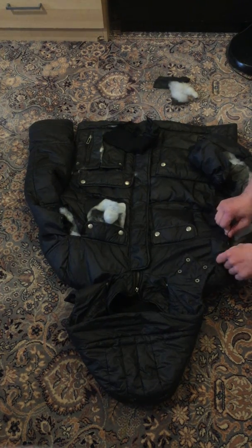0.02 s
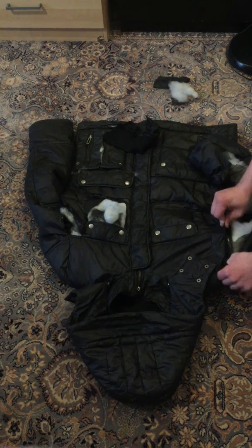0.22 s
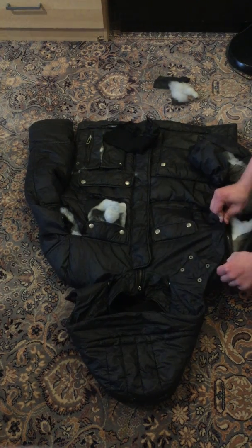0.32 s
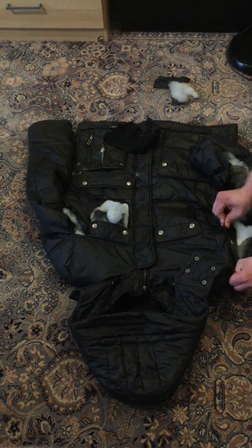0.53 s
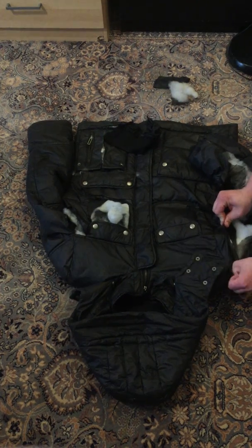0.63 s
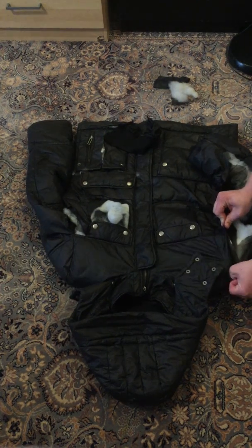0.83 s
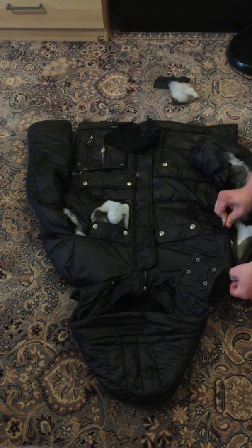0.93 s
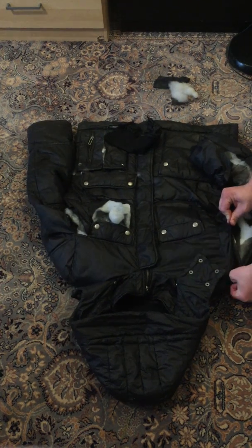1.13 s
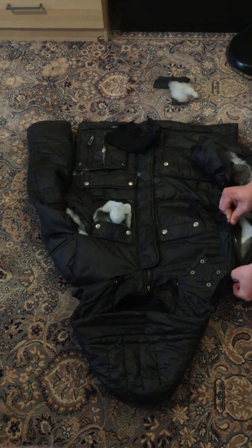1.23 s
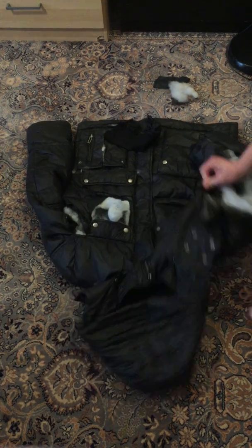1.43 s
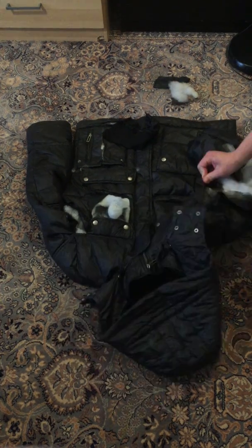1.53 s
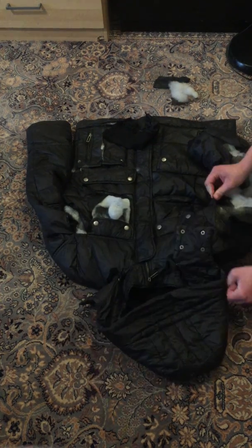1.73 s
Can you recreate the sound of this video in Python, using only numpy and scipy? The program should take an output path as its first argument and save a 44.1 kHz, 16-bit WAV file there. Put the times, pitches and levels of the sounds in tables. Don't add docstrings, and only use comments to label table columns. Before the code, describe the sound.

Tearing of a quilted nylon jacket by hand: crisp rips, single stitch pops, a final yank

```python
import sys
import numpy as np
from scipy import signal
from scipy.fft import rfft, irfft
from scipy.io import wavfile

SR = 44100
rng = np.random.default_rng(int(sys.argv[2]) if len(sys.argv) > 2 else 0)


def decibels_to_gain(level_db):
    exponent = np.asarray(level_db, float) / 20
    return 10 ** exponent


def to_wav(sig):
    pcm = np.clip(np.atleast_2d(sig), -1, 1) * 32767
    pcm = np.round(pcm).astype(np.int16)
    wavfile.write(sys.argv[1], SR, pcm.T)


N = 77175


def read(points, hz):
    f, value = np.transpose(points)
    return np.interp(np.log(hz + 1), np.log(f + 1), value)


def evened(x):
    return x / np.sqrt(np.mean(x ** 2) + 1e-20)


def coloured(x, points):
    gain = decibels_to_gain(read(points, np.fft.rfftfreq(len(x), 1 / SR)))
    return irfft(rfft(x) * gain, len(x))


def add(mix, s, sound):
    part = mix[max(round(s * SR), 0):][:len(sound)]
    part += sound[:len(part)]


# (frequency [Hz], level [dB per Hz])
HUSH_COLOUR = [(45, 3), (70, -0.5), (150, -6), (600, -10), (2500, -15), (6000, -19), (17000, -26)]


def room_hush():
    hush_db = -66.5
    return decibels_to_gain(hush_db) * evened(coloured(rng.standard_normal(N), HUSH_COLOUR))


# (frequency [Hz], t60 [s])
ROOM_DECAY = [(150, 0.26), (2500, 0.28), (6000, 0.21), (14000, 0.17)]
# (frequency [Hz], level [dB])
ROOM_COLOUR = [(150, -6), (700, 2.5), (2500, 1.5), (5000, 0.5), (9000, -5.5), (16000, -1.5)]


def room(x):
    tail_db, wall_db = -6.5, -9
    wall_s, wall_smear_s = 0.0049, 0.0021
    t = np.arange(SR // 2) / SR

    taps = np.zeros(len(t))
    at = np.arange(0, len(t) - 20, 20)
    taps[at + rng.integers(0, 20, len(at))] = rng.choice([-1., 1.], len(at))
    hz, frame_s, z = signal.stft(taps, SR, nperseg=256)
    decay = decibels_to_gain(-60 * frame_s / read(ROOM_DECAY, hz)[:, None])
    tail = signal.istft(z * decay, SR, nperseg=256)[1][:len(t)]
    tail = tail * np.clip((t - wall_s) / 0.0012, 0, 1)

    smear = np.exp(-((t - wall_s - wall_smear_s / 2) / wall_smear_s) ** 2 * 2)
    wall = rng.standard_normal(len(t)) * smear
    both = decibels_to_gain(tail_db) * tail / np.linalg.norm(tail) + decibels_to_gain(wall_db) * wall / np.linalg.norm(wall)
    return signal.fftconvolve(x, coloured(both, ROOM_COLOUR))[:N]


# (time [s], pitch [Hz], level [dB], t60 [s])
STUD_TINKS = [
    (1.656, 10099, -69, .12),
    (1.718, 9835, -66, .12),
    (1.718, 15665, -67, .1),
]
# (time [s], pitch [Hz], level [dB], t60 [s])
FOLD_RINGS = [(.2244, 6080, -20.5, 0.0014), (.2833, 690, -44, .006), (.4272, 14500, -20, 0.0022),
              (.5750, 13500, -16, .002), (.6403, 12500, -40, 0.0022), (.8187, 2760, -31, 0.0066),
              (.8187, 3270, -34.5, 0.0043), (.9897, 3320, -32.5, .005), (.2244, 1560, -36.5, .004),
              (.9899, 940, -40, 0.0058), (.9058, 5500, -38, 0.0035), (.9897, 5840, -27, 0.0066),
              (.9897, 9150, -28, 0.0074), (.9897, 1510, -31.5, 0.0079), (1.1762, 7300, -24, 0.0025),
              (1.1782, 1900, -33, .004), (1.1826, 6160, -45, 0.0022), (1.1897, 7000, -32, 0.006),
              (1.4099, 5800, -21, 0.009), (1.4118, 1880, -26, 0.0047), (1.4214, 16200, -10, .002),
              (1.4254, 6600, -11.5, .003), (1.4344, 1510, -34, 0.0035), (1.4486, 12100, -38, .003)]


def folds_and_studs():
    t, out = np.arange(6000) / SR, np.zeros(N)
    for s, hz, db, t60 in FOLD_RINGS + STUD_TINKS:
        decay = decibels_to_gain(db - 60 * t / t60)
        add(out, s, decay * np.sin(2 * np.pi * hz * t))
    return out


# (time [s], level [dB], pitch [Hz], rise to the crest [cycles])
PANEL_TUGS = [(.283, -33, 417, 0.7), (.297, -30.5, 596, 0.99), (0.3151, -21, 430, 0.15),
              (.327, -58, 605, 0.56), (.534, -36.5, 750, 0.59), (0.549, -42, 340, 1.15),
              (0.712, -55, 363, 1.5), (1.59, -49, 240, .6), (1.655, -57, 365, 1.4), (.905, -54, 600, 1.3),
              (.576, -40, 304, 0.6), (0.603, -42, 363, 0.96), (0.639, -41, 358, 1.3),
              (.669, -37.5, 357, 1.2), (.737, -47, 352, 0.43), (.819, -44.5, 386, 0.58),
              (0.9911, -28.5, 550, 0.24), (1.1772, -33, 650, 0.28), (1.183, -28.5, 464, 0.23),
              (1.411, -34.5, 560, 0.77), (1.42, -31, 302, 0.74), (1.433, -27.5, 648, 0.97),
              (1.465, -29, 254, 0.75), (1.5133, -36, 380, 0.3), (1.742, -56, 324, 0.97)]


def panel_tugs():
    push_db = -24.5
    t, out = np.arange(3000) / SR, np.zeros(N)
    for s, db, hz, cycles in PANEL_TUGS:
        u = t * hz / max(cycles, .2)
        rock = np.sin(2 * np.pi * hz * t) * u * np.exp(1 - u)
        push = decibels_to_gain(push_db) * np.sin(2 * np.pi * hz * 0.31 * t) * u * np.exp(-u / 2)
        add(out, s, decibels_to_gain(db) * (rock + push))
    return signal.lfilter(*signal.butter(2, 95, "high", fs=SR), out)


# (time [s], level [dB], brightness [0-1])
STIR_EFFORT = [
    (0, -80, 0.6),
    (.012, -65, 0.9),
    (0.049, -67, 0.84),
    (.1, -76, 0.58),
    (.15, -71, .9),
    (.17, -74, 1),
    (.215, -61, 0.94),
]
# (time [s], level [dB], brightness [0-1])
PULL_EFFORT = [
    (0.2255, -62, 0.66),
    (0.227, -41.5, 0.78),
    (.26, -35.5, 1),
    (0.28, -33, 1),
    (0.284, -29, 0.91),
    (0.309, -29, 0.99),
    (0.321, -24, 0.87),
    (.355, -31.5, 0.96),
    (0.412, -48.5, 0.7),
]
# (time [s], level [dB], brightness [0-1])
CREEP_EFFORT = [
    (.43, -45.5, 0.87),
    (.46, -41, 0.76),
    (.5, -44.5, 0.9),
    (.54, -44.5, 0.62),
    (0.602, -43, 0.73),
    (.68, -47.5, 0.88),
    (.76, -66, 0.6),
    (0.801, -72, 1),
    (1.39, -70.5, 0.1),
]
# (time [s], level [dB], brightness [0-1])
YANK_EFFORT = [
    (1.407, -62, 0.1),
    (1.416, -37, 0),
    (1.44, -31.5, 0.94),
    (1.47, -34.5, 0.74),
    (1.498, -42.5, 0.65),
    (1.599, -57.5, 0.48),
    (1.672, -63, 0),
    (1.7, -74, 0),
    (1.75, -55.5, 0),
]
# (frequency [Hz], level [dB per Hz])
DULL_COLOUR = [(60, -14), (300, -3), (1000, -4), (2000, -3.5), (3600, -11), (6000, -15), (17500, -44)]
# (frequency [Hz], level [dB per Hz])
BRIGHT_COLOUR = [(47, -53), (80, -39), (651, -2), (1070, -13.5), (1720, -0.5), (2520, -1.5), (17500, -3.5)]


def fibre_rush():
    fibres_per_s, spread_db, fibre_s = 8000, 2.3, .0004
    t = np.arange(N) / SR
    s, db, bright = np.transpose(STIR_EFFORT + PULL_EFFORT + CREEP_EFFORT + YANK_EFFORT)

    size = decibels_to_gain(spread_db * np.minimum(rng.exponential(1, N), 5))
    breaks = size * (rng.random(N) < fibres_per_s / SR)
    envelope = signal.lfilter([1], [1, -np.exp(-1 / (fibre_s * SR))], breaks)
    grains = envelope * rng.standard_normal(N)

    share = np.clip(np.interp(t, s, bright), 0, 1) ** 2
    dull_part = (1 - share) * evened(coloured(grains, DULL_COLOUR))
    bright_part = share * evened(coloured(grains, BRIGHT_COLOUR))
    return decibels_to_gain(np.interp(t, s, db, -120)) * (dull_part + bright_part)


# (time [s], snap [dB], bright edge above the snap
# [dB], cloth ring above the snap [dB])
BREAKING_THREADS = [(0.2248, -17, -3, -9.5), (0.2407, -32.5, 14, -15), (0.2833, -21, -1, -1),
                    (0.317, -24, -3, -2), (0.4274, -27.5, -11, 4), (0.4388, -27, 1, -1),
                    (0.4447, -30.5, -1, 7.5), (0.454, -26.5, -2, -4), (0.462, -39, 9, 3),
                    (0.4689, -27, -2, -2), (0.4933, -43, 0, 1), (0.5078, -37, 0, 0), (0.511, -34, 4, -5),
                    (0.5157, -29.5, -8, -4), (0.5205, -26, -2, -4), (0.523, -25.5, -2, -4.5),
                    (0.528, -26.5, 2, -4), (0.5338, -25, -18, -7), (0.5384, -28.5, 5, 4),
                    (0.5423, -41, 12, -16), (0.5445, -23, -3, -12), (0.5511, -33, 8, 7),
                    (0.557, -26.5, -3, -3), (0.5754, -21.5, 3.5, -15), (0.5784, -31, -4, -9),
                  (0.5883, -33, 13, -11), (0.5902, -37, 8, -3), (0.592, -45, 18, -11),
                  (0.6043, -25.5, -5, -11), (0.6086, -32, 3, 2), (0.6265, -36, 3, -2),
                  (0.6401, -31.5, 11.5, 0), (0.6434, -41, 15, -5), (0.6505, -46, 9, -9),
                  (0.6548, -49, 12, 2), (0.6669, -32, 7.5, -2), (0.6675, -37, 6, 0),
                  (0.6713, -29.5, -5, -15), (0.7063, -42, -12, -11), (0.7302, -40, -3, -13),
                  (0.7338, -41, 2, -9), (0.7356, -36, 0, -14), (0.7415, -35, 1, -9), (0.473, -40, -1, -1),
                  (.4815, -38, -3, 9), (.4865, -34.5, -5, 5.5), (0.6906, -47, -6, -12),
                    (0.8179, -21.5, -14, -16), (0.8917, -41, -6, -10), (0.893, -40, -5, -15),
                (0.895, -36.5, -2, -7), (0.8986, -39, -8, -13), (0.9062, -31, -8, -12),
                (0.91, -44, -9, -14), (0.9778, -44, -1, -10), (0.987, -36, -10, -7),
                (0.9896, -17.5, -5, -39), (1.0725, -44.5, -0.5, -14), (1.1418, -47, 3, -8),
                (1.1479, -41, -1, -15), (1.15, -42, -7, -16), (1.1547, -39, -7, -10), (1.172, -37, 0, -15),
                (1.1762, -22.5, -4, -10), (1.178, -20, -11, -12.5), (1.1821, -29, -12, -4.5),
                (1.1888, -27, -3, -14), (1.1908, -24, -1, -12), (1.2389, -39, -3, -21),
                (0.939, -51, -2, -18), (0.9827, -45, -8, -5), (1.0692, -48, 4, -15), (1.188, -28, -2, -10),
                (0.8981, -39, 1, -17),
                    (1.4031, -36, -9, -11), (1.4068, -41, 2, -16), (1.4099, -21.5, -9, -26),
                  (1.4119, -22.5, -0.5, -1.5), (1.4222, -15, -1, -10), (1.4252, -21, 0, -5),
                  (1.4344, -21, -4, -0.5), (1.4492, -33, 15, -9), (1.459, -27, 3, -24), (1.4175, -26, 0, 3),
                  (1.4719, -29, -4, -2), (1.506, -36, -8, -2), (.0115, -54.5, -14, 3.5),
                  (.148, -59, 2, -15), (0.2275, -32, -4, -7), (0.3555, -27, 2, 5.5)]
# (low edge [Hz], high edge [Hz], level [dB])
SNAP_BANDS = [
    (3680, 9200, 3),
    (11800, 17000, 2),
    (1180, 2780, -2.5),
]
WAKE_RISE_S = (0.00018, 0.000097, 0.00038)


def thread_snaps():
    wake_db, fray_db, fray_s = -15, -27, 0.0024
    rows = np.array(BREAKING_THREADS)
    time_s, snap_db, edge_db, cloth_db = rows.T
    t, out = np.arange(400) / SR, np.zeros(N)
    noise = rng.standard_normal((len(rows), len(t)))
    crack = t == 0
    fray = decibels_to_gain(fray_db) * np.exp(-t / fray_s)

    snaps = 0
    shares_db = (0 * snap_db, edge_db, cloth_db)
    for (lo_hz, hi_hz, band_db), rise_s, share_db in zip(SNAP_BANDS, WAKE_RISE_S, shares_db):
        band = signal.butter(3, [lo_hz, hi_hz], "band", fs=SR, output="sos")
        wake = decibels_to_gain(wake_db) * t / rise_s * np.exp(1 - t / rise_s)
        part = signal.sosfilt(band, crack + noise * (wake + fray))
        part = part / abs(part).max(1, keepdims=True)
        snaps = snaps + part * decibels_to_gain(snap_db + share_db + band_db)[:, None]
    for s, snap in zip(time_s, snaps):
        add(out, s, snap)
    return out


def scene():
    jacket = thread_snaps() + fibre_rush() + folds_and_studs() + panel_tugs()
    return (jacket + room(jacket) + room_hush())[None]


def band_limit(x):
    return signal.sosfilt(signal.butter(12, 19590, fs=SR, output="sos"), x)


def record(dry):
    shelf = [(25, -30), (45, 0), (17250, 0), (17500, -42), (19500, -46), (19900, -90)]  # (Hz, dB)
    return band_limit(coloured(dry[0], shelf)[None])


dry = scene()
out = record(dry)
to_wav(out)
```